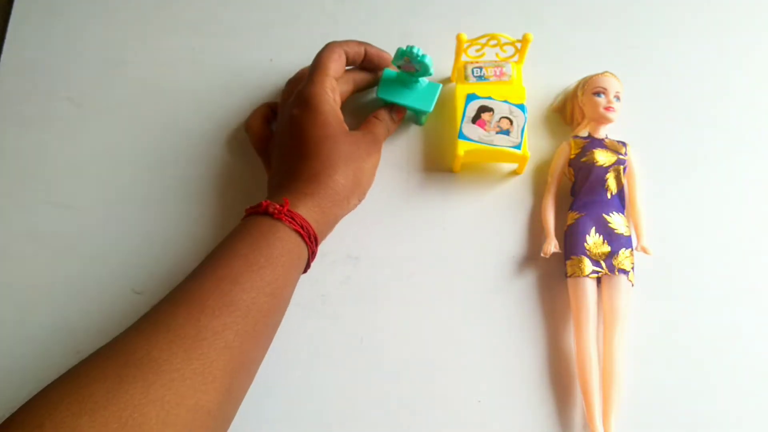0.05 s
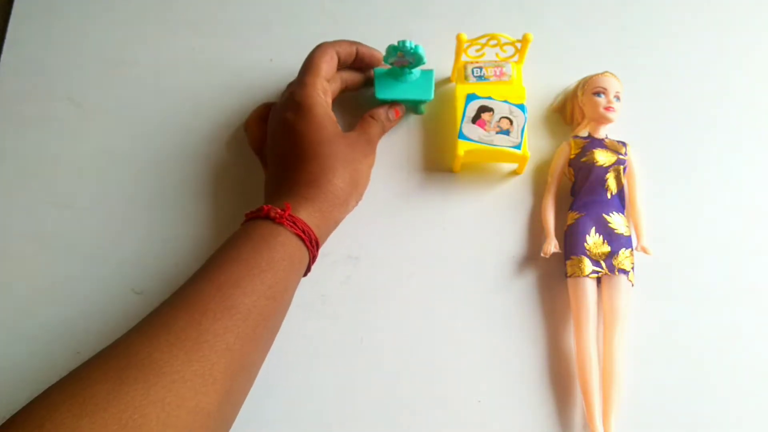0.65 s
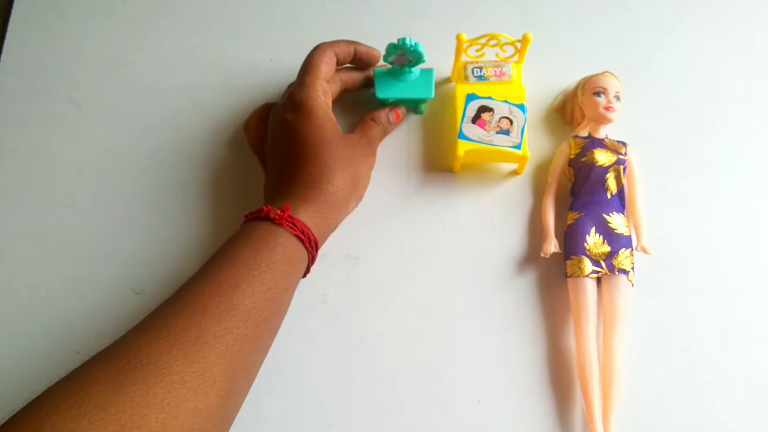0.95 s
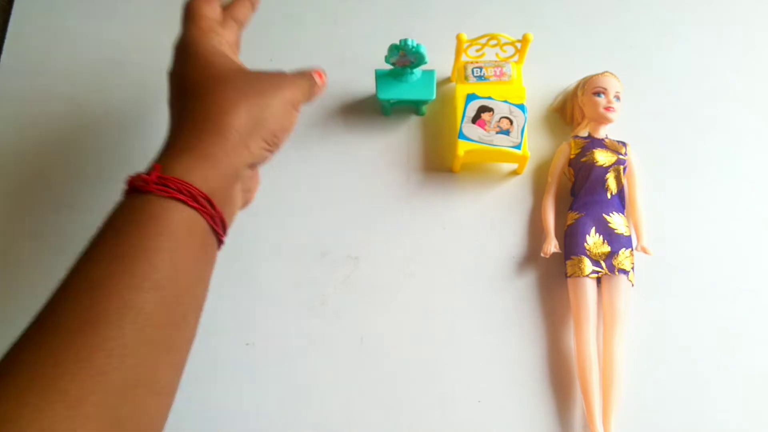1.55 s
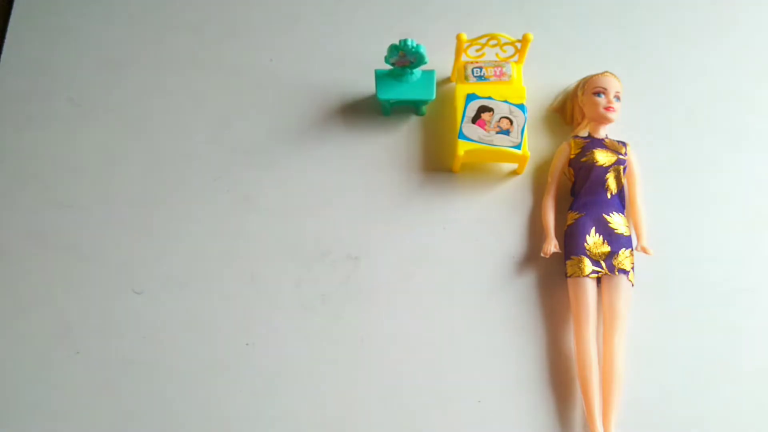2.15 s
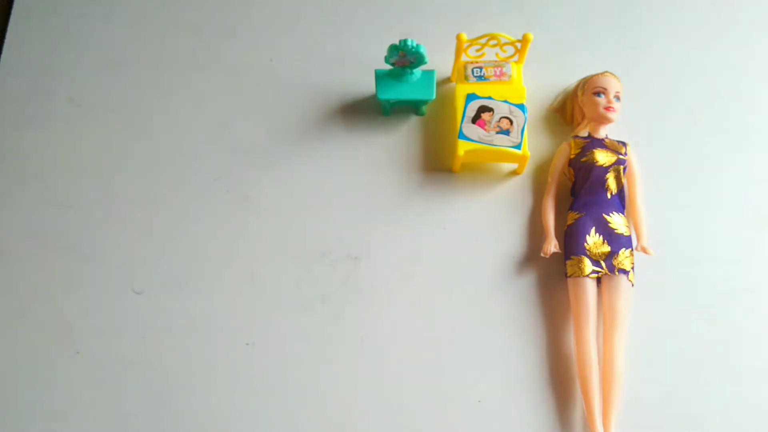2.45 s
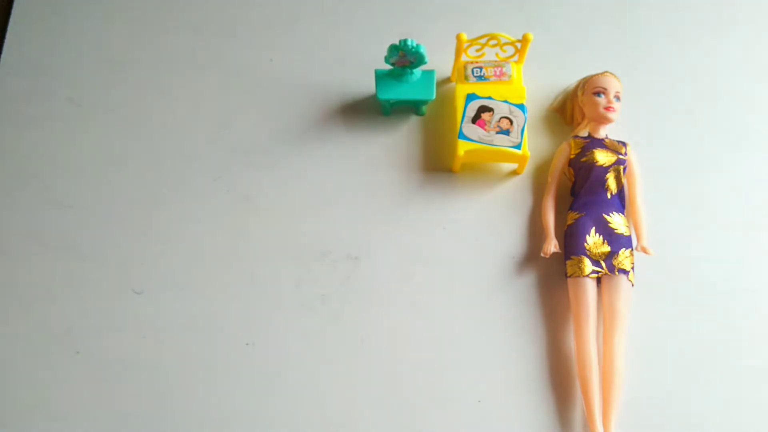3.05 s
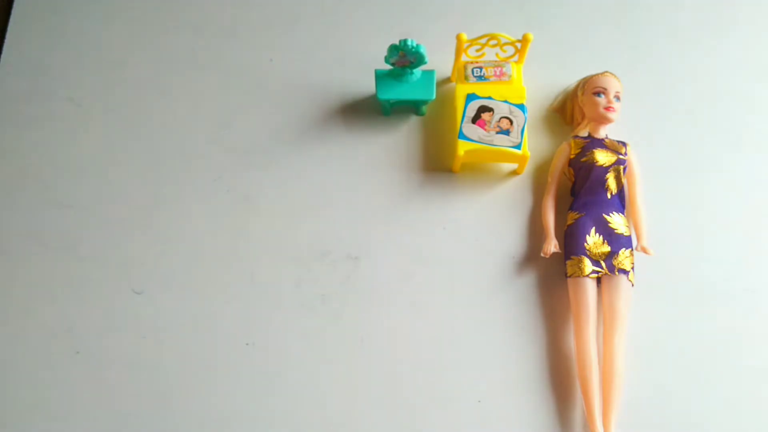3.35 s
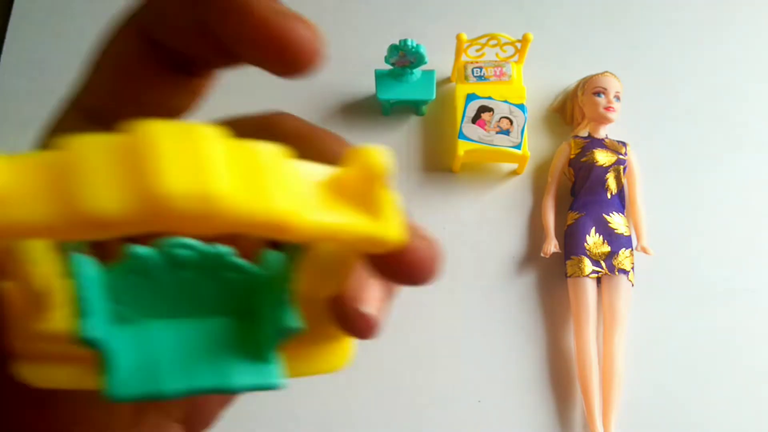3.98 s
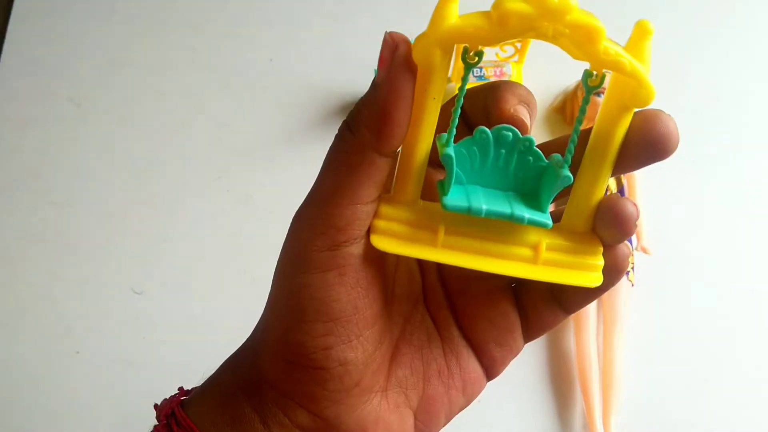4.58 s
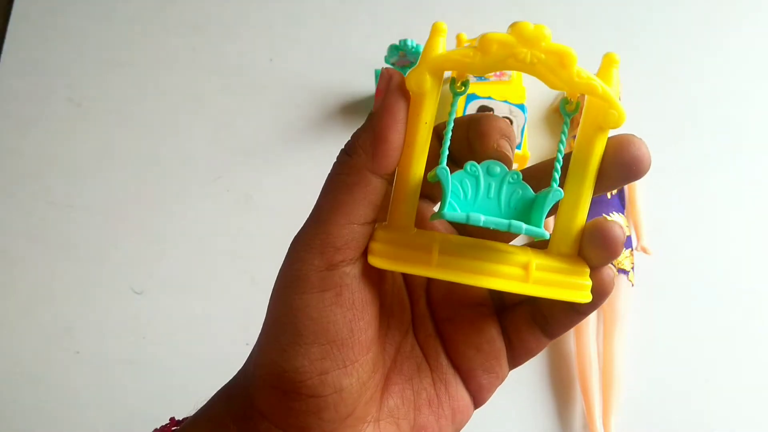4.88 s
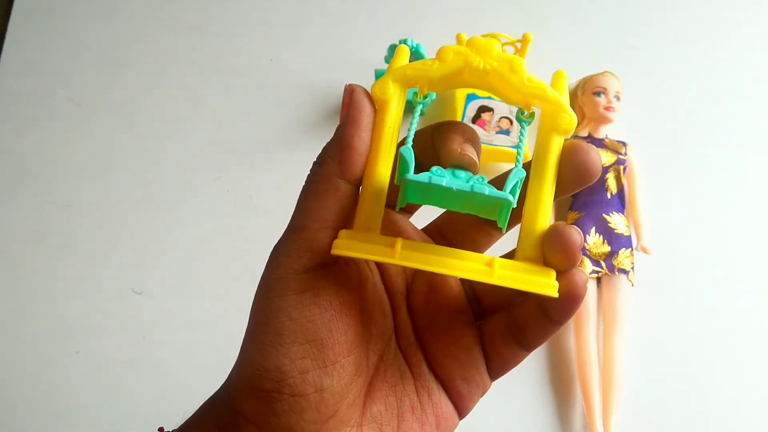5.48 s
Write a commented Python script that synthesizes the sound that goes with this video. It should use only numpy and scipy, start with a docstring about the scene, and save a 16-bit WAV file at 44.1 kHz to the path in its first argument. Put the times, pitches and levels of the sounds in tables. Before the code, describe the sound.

From a quiet, echoing room, the microphone picks up small birds outside: faint overlapping twitters, hoarse little buzzes, mellow whistles on the left and high chirps on both sides. Then a closer bird stands out with three matching whistled phrases, while the distant ones carry on. A low murmur, even hiss, faint drone and barely audible deep throb lie underneath.

```python
"""A quiet, hard-walled room with small birds outside. Distant ones twitter, buzz, whistle and chirp;
then a nearer one whistles the same phrase three times: a down-slur, a held note and two steps up.
Each note is a trembling, nearly pure tone from a bird's syrinx and rings on between the walls.
Underneath: a soft outdoor murmur, hiss, a faint drone and a very deep throb."""
import sys
import numpy as np
from scipy import signal
from scipy.fft import rfft, irfft
from scipy.io import wavfile
from scipy.ndimage import uniform_filter1d, map_coordinates

SR = 44100
rng = np.random.default_rng(int(sys.argv[2]) if len(sys.argv) > 2 else 0)


def output_pcm(signal):
    """Save a mono or channel-first signal as 16-bit PCM at the path in sys.argv[1].

    Samples are clipped to [-1, 1] before scaling.
    """
    pcm = np.clip(np.atleast_2d(signal).T, -1, 1) * 32767
    wavfile.write(sys.argv[1], SR, np.round(pcm).astype(np.int16))


N = 252252
BIN_HZ = np.arange(N // 2 + 1) * SR / N


def undb(db):
    """Decibels to gain."""
    return 10 ** (np.asarray(db) / 20)


def wander(rate_hz, size):
    """Smooth random curve, spread near 1."""
    return map_coordinates(rng.standard_normal(4096), [np.arange(size) / SR * rate_hz], order=2, mode="wrap")


def on_bins(points):
    """Interpolate (frequency, value) points onto BIN_HZ, on a log axis."""
    hz, value = np.transpose(points)
    return np.interp(np.log(BIN_HZ + 1), np.log(hz), value)


def add(out, sound, start_s):
    """Mix a sound in at a start time."""
    i = int(np.clip(start_s * SR, 0, N - 1))
    out[..., i:i + sound.shape[-1]] += sound[..., :N - i]


def pan(db):
    """Stereo gains for a left-minus-right level."""
    return undb(np.array([[db], [-db]]) / 2)


# (frequency [Hz], relative density [dB])
AIR_SPECTRUM = [(24, -28), (40, -10), (59, -15), (141, -16), (269, -23.5), (361, -18), (440, -18.5),
                (578, -23), (880, -24.5), (1160, -29.5), (2140, -28), (2370, -34.5), (3270, -32),
                (4080, -39.5), (14800, -45)]
# (frequency [Hz], left-right correlation [-])
AIR_CORRELATION = [(50, 0.62), (150, 0.51), (400, 0.055), (1500, 0.0077), (8000, 0.12)]


def outdoor_air(level_db=-53, swell_db=1.48, crossover_hz=1200):
    """Gently swelling low murmur under an even hiss."""
    gain = undb(on_bins(AIR_SPECTRUM))
    alike = on_bins(AIR_CORRELATION)
    mid, side = rfft(rng.standard_normal((2, N))) * gain * np.sqrt([1 + alike, 1 - alike])
    ears = np.array([mid + side, mid - side])
    lowpass = 1 / (1 + (BIN_HZ / crossover_hz) ** 2)
    murmur = irfft(ears * lowpass, N) * undb(swell_db * wander(5.02, N))
    hiss = irfft(ears * (1 - lowpass), N)
    air = murmur + hiss
    return air / air.std() * undb(level_db)


def drone(hz=532, width_hz=12, level_db=-71):
    """Faint, wavering tone: a narrow band of noise."""
    band = np.exp(-.5 * ((BIN_HZ - hz) / width_hz) ** 2)
    tone = irfft(rfft(rng.standard_normal((2, N))) * band, N)
    return tone / tone.std() * undb(level_db)


def syrinx(hz, overtone_db, waver=.0054, flutter_db=1):
    """A bird's voice: fundamental plus octave, trembling in pitch and level."""
    size = len(hz)
    phase = 2 * np.pi * np.cumsum(hz * (1 + waver * wander(189.1, size))) / SR
    edges = signal.windows.tukey(size, min(1, 260 / size))
    flutter = undb(flutter_db * wander(86.5, size))
    return np.sqrt(2) * edges * flutter * (np.sin(phase) + undb(overtone_db) * np.sin(2 * phase))


def slurred_note(length_s, contour_hz, overtone_db):
    """Slightly hoarse note that bends through three pitches as it swells and fades."""
    u = np.linspace(0, 1, int(max(length_s, .01) * SR))
    hz = np.polyval(np.polyfit([0, .5, 1], contour_hz, 2), u)
    return syrinx(hz, overtone_db, waver=.014, flutter_db=3) * np.abs(np.sin(np.pi * u)) ** .36


def walls(sound, early_t60_s, early_db, late_t60_s=1.9):
    """Dense echoes, different at each ear: quick ones from near walls, then a long ring."""
    t = np.arange(2 * SR) / SR
    arrived = t > .003
    early, late = (rng.standard_normal((2, len(t))) * undb(-60 * t / t60_s) * arrived
                   for t60_s in (early_t60_s, late_t60_s))
    response = undb(early_db) * early / np.linalg.norm(early[0]) + late / np.linalg.norm(late[0])
    return signal.fftconvolve(sound[None], response, axes=1)[:, :N]


# (time [s], level [dB])
FLOCK_LEVEL = [(0, -66.5), (.4, -81.5), (.8, -67.5), (1.2, -71), (1.7, -68), (2.1, -69.5), (2.7, -64),
               (3.3, -68), (4.0, -71.5), (4.5, -69), (5.2, -64.5), (5.7, -70)]
# (pitch [Hz], gain [dB])
FLOCK_COLOUR = [(1300, 3), (1900, 2.5), (2600, 7), (3600, -1.5), (4200, -3), (5300, -9.5)]


def flock(count=600, gain_db=-3):
    """Quick twitter of many distant birds, heard only off the walls."""
    voices = np.zeros(N)
    colour_hz, colour_db = np.transpose(FLOCK_COLOUR)
    for k in range(count):
        start_s = (k + rng.random()) / count * N / SR
        hz = rng.uniform(colour_hz[0], colour_hz[-1])
        contour_hz = hz * np.exp(.07 * rng.standard_normal(3))
        note = slurred_note(rng.uniform(.02, .05), contour_hz, overtone_db=-40)
        db = np.interp(start_s, *np.transpose(FLOCK_LEVEL)) + np.interp(hz, colour_hz, colour_db)
        add(voices, note * undb(db + gain_db), start_s)
    return walls(voices, early_t60_s=.12, early_db=2.5)


# (start [s], length [s], pitch [Hz], level [dB])
BUZZ_CALLS = [(0, 0.05, 2037, -60), (0, 0.05, 2956, -64), (0.429, 0.1, 1998, -57.5),
              (0.584, .12, 2045, -57), (1.80, 0.17, 1856, -55.5), (2.27, 0.17, 3540, -64),
              (2.64, 0.066, 3416, -57.5), (3.951, .21, 4810, -68), (4.252, 0.11, 4210, -64),
              (5.427, 0.17, 5090, -67.5), (5.469, 0.27, 4350, -69)]


def buzzes(rasp=.045, direct_db=-3, room_db=-4):
    """Hoarse calls: the pitch shakes fast enough to smear into a band."""
    voice = np.zeros(N)
    for start_s, length_s, hz, db in BUZZ_CALLS:
        size = int(length_s * SR)
        note = syrinx(hz * (1 + rasp * wander(700, size)), overtone_db=-35)
        add(voice, note * np.hanning(size) ** .27 * undb(db), start_s)
    return undb(direct_db) * voice + undb(room_db) * walls(voice, early_t60_s=.36, early_db=2)


# (start [s], level before filtering [dB])
THROB_PULSES = [(.034, -4.5), (.316, -2), (.627, -3.5), (.928, -2), (1.243, -2), (1.561, -4.5), (1.855, -3),
                (2.168, .5), (2.513, -2.5), (2.829, -3.5), (3.135, -3), (3.711, -4), (4.303, -3.5),
                (4.611, -3), (5.011, -3), (5.32, -4.5), (5.612, -4)]


def throb(pulse_s=.073, lowpass_hz=1, highpass_hz=6.19):
    """Soft pulses, about three a second, each swinging out below the range of hearing."""
    pulses = np.zeros(N)
    for start_s, db in THROB_PULSES:
        add(pulses, -undb(db) * np.hanning(int(pulse_s * SR)), start_s)
    smoothed = signal.sosfilt(signal.butter(1, lowpass_hz, fs=SR, output="sos"), pulses)
    return signal.sosfilt(signal.butter(4, highpass_hz, "high", fs=SR, output="sos"), smoothed)


# (start [s], length [s], first pitch [Hz], middle pitch [Hz], last pitch [Hz], level [dB], echo send [dB])
WHISTLE_NOTES = [ (0.142, 0.073, 2660, 2860, 2630, -57, -3), (0.826, .12, 1495, 1685, 1710, -56, -0.5),
                 (0.97, 0.093, 1658, 1653, 1573, -55.5, -1), (1.227, .14, 2260, 2610, 2735, -55.5, 4.5),
                 (1.389, 0.036, 2706, 2480, 2170, -55, 2), (1.414, 0.049, 2260, 2192, 2210, -59, 15),
                 (1.562, .11, 1510, 1645, 1490, -55, -8), (1.759, 0.063, 1420, 1790, 1763, -55, 4),
                 (2.496, .052, 2480, 2413, 2540, -65, 6.5), (2.631, .091, 2584, 2615, 2740, -60, -1),
                 (4.522, .18, 1818, 1680, 1504, -57.5, -2), (4.765, 0.17, 1860, 1670, 1550, -58, 1.5),
                 (5.407, 0.16, 1490, 1804, 1823, -53.5, -3.5), (5.598, .069, 2354, 2375, 2170, -52, 0),
                 (5.676, 0.055, 2140, 1990, 1850, -60, 4)]


def far_whistles(direct_db=-3.5, room_db=-2, pan_db=16):
    """Mellow slurs from a perch on the left; some arrive mostly as echo."""
    voice, send = np.zeros((2, N))
    for start_s, length_s, first_hz, middle_hz, last_hz, db, send_db in WHISTLE_NOTES:
        overtone_db = -20 - 45 * np.log2(middle_hz / 1700)  # audible on low notes only
        note = undb(db) * slurred_note(length_s, [first_hz, middle_hz, last_hz], overtone_db)
        add(voice, note, start_s)
        add(send, note * undb(send_db), start_s)
    echo = walls(send, early_t60_s=.11, early_db=-9)
    return undb(direct_db) * voice * pan(pan_db) + undb(room_db) * echo


# (start [s], length [s], pitch [Hz], sweep [oct], level [dB], left minus right [dB])
CHIRP_NOTES = [ (1.27, 0.026, 3700, 0.15, -62, -14), (1.344, 0.044, 3510, -.16, -64, -8),
               (1.456, .035, 3405, 0.32, -60, -13), (1.795, 0.096, 3270, -.04, -57.5, 7),
               (2.122, 0.03, 3310, .03, -59.5, 2), (2.287, .022, 5020, -.24, -66, -7),
               (2.449, .032, 3550, .29, -61, 11), (2.564, 0.032, 3740, 0.17, -56.5, 11),
               (2.572, 0.053, 4690, -.26, -64.5, -13), (2.896, .055, 3613, -0.12, -57.5, -21.5),
               (3.235, 0.047, 4080, -0.31, -66, -11), (3.36, 0.045, 3730, -0.305, -59.5, -14),
               (3.458, 0.072, 3630, 0, -57.5, -17.5), (3.712, .02, 4659, -0.275, -59, 2),
               (4.657, .033, 4700, -.39, -64, 10), (5.419, 0.064, 3610, 0, -59.5, 12),
               (5.506, 0.05, 3600, -.03, -56.5, 17)]


def far_chirps(arch_oct=.033, direct_db=-3, room_db=-5):
    """Short, high, slightly arched sweeps from perches on both sides."""
    voices, send = np.zeros((2, N)), np.zeros(N)
    for start_s, length_s, hz, sweep_oct, db, pan_db in CHIRP_NOTES:
        contour_oct = np.array([-sweep_oct / 2 - arch_oct, 0, sweep_oct / 2 - arch_oct])
        note = undb(db) * slurred_note(length_s, hz * 2 ** contour_oct, overtone_db=-60)
        add(voices, note * pan(pan_db), start_s)
        add(send, note, start_s)
    return undb(direct_db) * voices + undb(room_db) * walls(send, early_t60_s=.15, early_db=-2)


def chips(start_s=2.073, count=7, rate_hz=5.32, length_s=.047, first_hz=4200, last_hz=1300, room_db=-2):
    """An even run of calls, each plunging in pitch and growing louder as it flattens out."""
    voice = np.zeros(N)
    u = np.linspace(0, 1, int(length_s * SR))
    hz = last_hz + (first_hz - last_hz) * (1 - u) ** 1.7
    swell = undb(-71.4 + 8.6 * u)
    for k in range(count):
        add(voice, syrinx(hz, overtone_db=-14) * swell, start_s + k / rate_hz)
    return voice + undb(room_db) * walls(voice, early_t60_s=.34, early_db=8.5)


SECOND_STEP_HZ, TOP_HZ = 3107, 3917


def phrase_contour(held_s, held_hz, lift_hz, first_s, first_hz, second_s, top_s):
    """Pitch [Hz] and level [dB] of a soft lead note, down-slur, held note, two steps and top note."""
    lead_s, slur_s, glide_s = .023, .023, .0057
    lead_hz, brink_hz, dip_hz, flat_hz = 3000, 2770, 1720, 168.3
    lead, slur, held, first, second, top = (np.linspace(0, 1, int(length_s * SR)) for length_s in
                                            (lead_s, slur_s, held_s, first_s, second_s, top_s))
    # held note: scoops out of the dip, starts flat and accented, settles, lifts at the end
    t = held * held_s
    scoop_hz = (held_hz - flat_hz - dip_hz) * np.exp(-t / .00094)
    settling = np.exp(-t / .0172)
    lift = np.exp((t - held_s) / .014)
    notes = [(lead_hz + (brink_hz - lead_hz) * lead ** 4, -50 + 14.5 * lead ** 2),
             (brink_hz + (dip_hz - brink_hz) * slur ** .7, -35.5 - 21.5 * slur ** 2),
             (held_hz - scoop_hz - flat_hz * settling + lift_hz * lift, -37 + 1.5 * settling),
             (np.full_like(first, first_hz), np.full_like(first, -39.5)),
             (SECOND_STEP_HZ - 116 * second ** 6, -36.5 + 3.5 * second),
             (TOP_HZ - 190 * top, -42.5 - 3.5 * top)]
    return uniform_filter1d(np.hstack(notes), size=int(glide_s * SR), axis=1)


# (start [s], held length [s], held pitch [Hz], end lift [Hz], first step length [s],
#  first step pitch [Hz], second step length [s], top note length [s], gain [dB], echo send [dB])
NEAR_PHRASES = [(3.336, .165, 2453, 150, .019, 2920, .034, .026, 1.3, -1.8),
                (3.937, .150, 2388, 60, .025, 2635, .043, .031, -.6, 1),
                (4.641, .156, 2340, 70, .021, 2925, .038, .028, -1, 1.3)]


def near_bird(top_rasp=.016, unsteady_db=.8, direct_db=-1.5, room_db=-4, pan_db=-1.5, echo_db_per_oct=-4):
    """Three whistled phrases, pure up to the hoarse top note; the walls return less at higher pitch."""
    voice, send = np.zeros((2, N))
    for start_s, *shape, gain_db, send_db in NEAR_PHRASES:
        hz, db = phrase_contour(*shape)
        rasp = top_rasp * np.clip((hz - SECOND_STEP_HZ) / (TOP_HZ - SECOND_STEP_HZ), 0, 1)
        shaken_hz = hz * (1 + rasp * wander(500, len(hz)))
        song = syrinx(shaken_hz, overtone_db=-48, waver=.005, flutter_db=.7)
        song *= undb(db + gain_db + unsteady_db * wander(35, len(hz)))
        add(voice, song, start_s)
        add(send, song * undb(send_db + echo_db_per_oct * np.log2(hz / np.median(hz))), start_s)
    echo = walls(send, early_t60_s=.12, early_db=-7)
    return undb(direct_db) * voice * pan(pan_db) + undb(room_db) * echo


def scene():
    """Birds far and near over the quiet background."""
    return (outdoor_air() + drone() + flock() + buzzes() + throb()
            + far_whistles() + far_chirps() + chips() + near_bird())


def record(dry):
    """Steep low-pass at 15 kHz."""
    return signal.sosfilt(signal.ellip(12, .1, 70, 15000, fs=SR, output="sos"), dry)


dry = scene()
out = record(dry)
output_pcm(out)
```